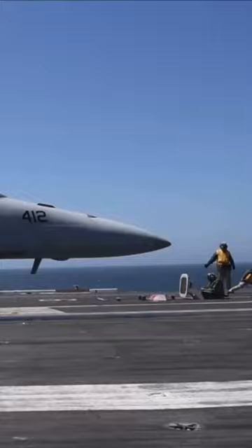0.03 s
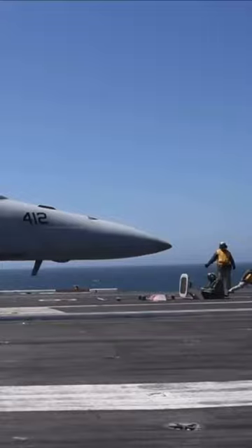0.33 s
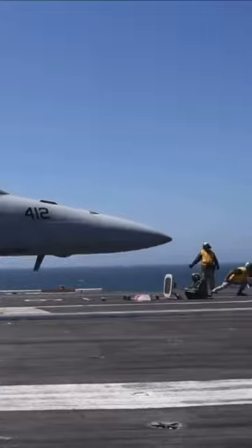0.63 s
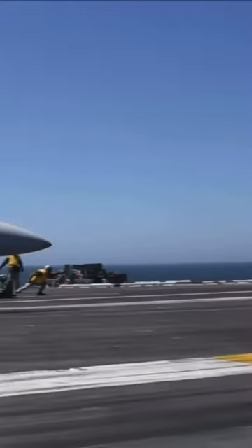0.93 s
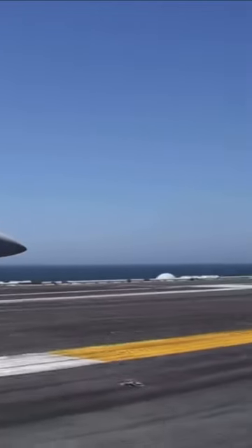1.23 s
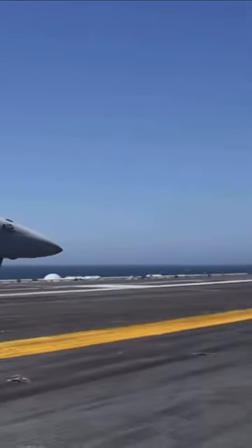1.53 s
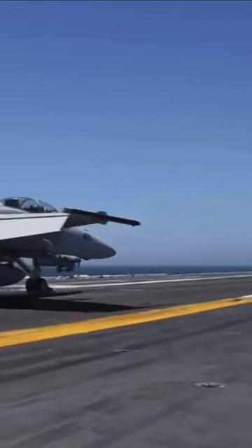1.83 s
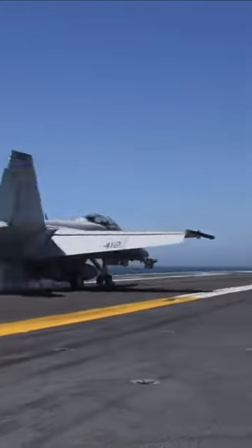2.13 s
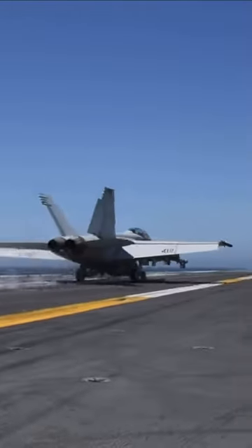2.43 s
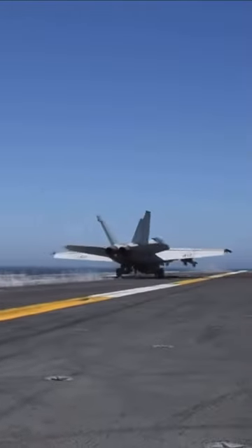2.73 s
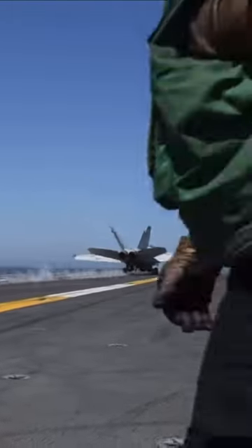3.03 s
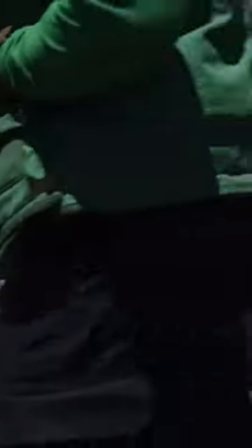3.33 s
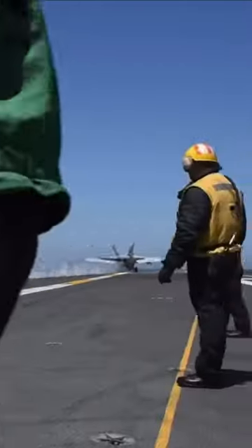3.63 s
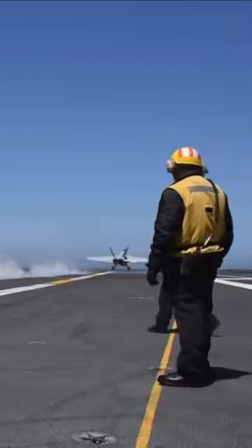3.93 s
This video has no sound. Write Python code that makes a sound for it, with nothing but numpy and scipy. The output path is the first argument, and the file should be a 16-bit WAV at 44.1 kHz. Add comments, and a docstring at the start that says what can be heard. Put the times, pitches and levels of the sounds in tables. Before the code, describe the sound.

Jet engines roar at full power, pass close by and rumble away.

```python
"""A bright roar, with hiss and the rush of air intakes, is heard first: a jet at full power, seen from
ahead on an open carrier deck. It rolls past the microphone at about 2 s and races away. From behind,
the deep rumble of the exhaust's large eddies takes over, and the hiss of its fine turbulence dulls
with distance. A faint, steady deep bass lies in the middle. The jet's sound crosses between the
microphone's two ports and overloads them throughout."""
import sys
import numpy as np
from scipy import signal
from scipy.io import wavfile
from scipy.ndimage import map_coordinates

SR = 44100
rng = np.random.default_rng(int(sys.argv[2]) if len(sys.argv) > 2 else 0)


def digitize_waveform(pressure):
    """Quantize a signal to 16-bit integers and store it at the path in sys.argv[1].

    Rows of a 2-D input are taken as channels; values are limited to [-1, 1].
    """
    field = np.atleast_2d(pressure).T
    bounded = np.clip(field, -1, 1)
    quanta = np.round(bounded * 32767).astype(np.int16)
    wavfile.write(sys.argv[1], SR, quanta)


N = 176400
TIME = np.arange(N) / SR

# direction and directness of the sound: (time [s], lag of the left port [ms], coherence [0-1])
BEARING = [(0, -0.17, 0.37), (.6, -.17, 0.6), (.9, -0.21, 0.6), (1.3, -0.18, 0.27), (1.7, -0.15, 0.76),
           (2.0, -0.044, 0.74), (2.3, 0.066, 0.6), (2.55, 0.068, 0.32), (2.85, 0.052, 0.47),
           (3.2, 0.02, 0.94), (3.37, 0.093, 0.85), (3.6, 0.068, 0.84), (4, 0.024, 0.93)]
# shadow on the right port while the jet is off to the left: (time [s], centre [Hz], height [dB])
PORT_SHADOW = [(0, 3400, 1), (.55, 3100, -1.5), (.8, 2800, -4), (1.15, 2700, -3), (1.4, 2600, -1)]
# envelopes of the exhaust's three parts: (time [s], relative level [dB], left minus right [dB])
ROAR_ENVELOPE = [(0.05, -22.5, -2), (0.14, -23.5, -3.5), (0.57, -24, -6), (0.92, -23.5, -4),
                 (1.3, -24.8, -4), (1.55, -25.5, -1.5), (1.77, -24, -1.5), (1.97, -24.5, -3),
                 (2.1, -27, -5.5), (2.33, -25, -4), (2.41, -23.6, -4), (2.59, -23.5, -2.5),
                 (2.82, -21.5, -1), (3.03, -24.5, -2), (3.14, -21.5, -5), (3.28, -20.7, -2),
                 (3.55, -21.5, -3), (3.76, -20, -1.5), (4.0, -23.5, -0.5)]
HISS_ENVELOPE = [(0.05, -24.5, 2.5), (0.5, -23.5, 2.5), (0.72, -24.5, 2), (1.25, -23, -1), (1.6, -23, 0.5),
                 (1.8, -23, -1), (1.97, -24, -3), (2.28, -23, -2.5), (2.42, -22, -1), (2.6, -23, 0.5),
                 (3.0, -24, 1), (3.3, -27.5, 1), (3.48, -27.5, 0), (3.8, -28, 1.5), (4.0, -30, 1.5)]
RUMBLE_ENVELOPE = [(0, -30.5, -8), (.85, -30.5, -5.5), (1.35, -30.5, -3.5), (1.7, -33.5, 0.5),
                   (1.86, -31.5, 2.5), (2.01, -25.5, -1), (2.23, -24.5, -2), (2.45, -26, 3),
                   (2.56, -28.5, 5), (2.86, -27, 1), (3.03, -24.5, -2), (3.3, -22.5, -1.5),
                   (3.55, -23.5, 2), (3.8, -25, -2.5), (3.93, -20, -4), (4, -22, -1)]
# spectra: (frequency [Hz], relative spectral density [dB], share of the coherence [0-1])
ROAR_SPECTRUM = [(382, -7, 0.44), (600, -4.5, 0.39), (970, -1, 0.86), (1420, -1.3, 0.63),
                 (2080, -3.5, 0.65), (2820, -2.5, 0.57), (3760, -9.8, 0.26), (5250, -20.5, 0.58)]
HISS_SPECTRUM = [(1920, -13, 0.36), (3000, 2.5, 0.19), (4200, 0.5, 0.28), (6000, -1.5, 0.32),
                 (8100, -0.6, 0.33), (10500, -1.5, 0.088), (14000, -0.5, 0.075)]
RUMBLE_SPECTRUM = [(28, -22, .3), (50, -15.5, .4), (81, -4.5, 0.75), (132, -4, 1), (240, -0.5, 0.96),
                   (413, -2.5, 1), (536, -1.5, 0.9), (705, -5, 0.59), (1100, -9, 0.62)]
CENTRED_BASS_SPECTRUM = [(28, -7, .5), (60, -1, 0.9), (110, 1.5, 1), (170, -10, 1)]
# moving humps on those spectra: (time [s], centre [Hz], height [dB])
ROAR_HUMP = [(0, 1140, 4), (.7, 990, 1.5), (1.15, 850, 1), (1.42, 1800, 0.5), (1.62, 2120, 5),
             (1.78, 1950, 5), (1.97, 2100, 8), (2.25, 2900, 3), (2.7, 2400, 2.5), (3.3, 1900, 1.5),
             (3.7, 1600, 1), (3.85, 1240, 2.5), (4, 1030, 4.5)]   # moves with the angle to the jet
PORT_RESONANCE = [(2.2, 6340, 3), (2.5, 6200, 3.5), (3.25, 6600, 1.5), (3.5, 6250, 5), (4, 6300, 2)]   # a peak near 6 kHz, probably the microphone's, colouring the hiss
RUMBLE_BOOM = [(0, 400, -1.5), (1.5, 500, 1.5), (1.95, 350, 2.5), (2.25, 304, 3), (2.6, 151, 2.5),
               (3.1, 153, 6), (3.7, 198, 2.5), (3.95, 244, 5)]   # the rumble's strongest region
# rush of the intakes, fading once the jet has passed: (time [s], centre [Hz], level [dB])
INTAKE_RUSH = [(0, 5820, -25.5), (.5, 6000, -25), (.8, 5840, -27), (1.25, 5700, -28.5), (1.5, 6150, -26.3),
               (1.66, 6700, -27), (1.79, 7400, -27.5), (1.93, 7350, -38), (2.15, 7140, -44),
               (2.6, 6800, -54)]
# its resonances: (multiple of the centre [ratio], relative level [dB], width of one stage [Hz],
# left minus right on approach [dB], swell once rolling [dB])
INTAKE_RESONANCES = [(1.01, -1.2, 2000, -15, 0), (1, -8, 400, -4, -2.5), (.77, -7.5, 1600, -5, 6)]

ROLL_S, ROLL_RISE_S = .65, .25   # the jet starts to roll
PASS_S, PASS_LENGTH_S = 2.06, 0.12
CROSSING_S = 0.58   # time the intakes take to swing to the middle before the pass
RECEDE_S, DULLING_DB_PER_OCT_S, PASS_DULLING_DB_PER_OCT = 3.3, -5, -2.5
AIR_LOSS_DB_PER_S, AIR_HZ, AIR_START_S = 10.5, 12500, 1.97
HISS_PAN_DB_PER_OCT, HISS_PIVOT_HZ = 2, 7460   # from ahead the top of the hiss favours the left port
BANDS_PER_OCTAVE, CUTOFF_HZ = 3, 15000
SILENT_START_S, OVERLOAD_TOP, MIC_TREBLE_HZ = .036, 0.29, 12800


def from_db(db):
    """Amplitude grows tenfold for every 20 dB."""
    return 10 ** (np.asarray(db) / 20)


def unit_rms(x):
    """Normalisation to a mean power of 1."""
    return x / np.sqrt(np.mean(x ** 2) + 1e-20)


def in_time(rows):
    """Linear interpolation of each column of a curve to every sample."""
    times, *columns = np.transpose(rows)
    return [np.interp(TIME, times, column) for column in columns]


def drift(rate_hz):
    """Low-passed noise gives a slow random motion of spread 1."""
    pole = np.exp(-200 * np.pi * rate_hz / SR)   # one step per 100 samples
    slow = signal.lfilter([1], [1, -2 * pole, pole * pole], rng.standard_normal(N // 100 + 1002))[1000:]
    return np.interp(np.arange(N) / 100, np.arange(len(slow)), unit_rms(slow))


def panned(db):
    """Constant-power panning: left and right gains for a level difference."""
    gains = from_db(np.array([db, -db]).reshape(2, -1) / 2)
    return gains / np.sqrt(np.mean(gains ** 2, axis=0))


def behind():
    """Weight for directivity: 0 while the jet approaches, 1 once its nozzles have passed."""
    return .5 + .5 * np.tanh((TIME - PASS_S) / PASS_LENGTH_S)


def moving_hump(rows, octaves):
    """A Gaussian bell over log frequency that follows a curve; gives dB as a function of Hz."""
    centre, height_db = in_time(rows)
    return lambda hz: height_db * np.exp(-.5 * (np.log2(hz / centre) / octaves) ** 2)


def far_port_shadow():
    """Acoustic shadowing notches the right port only; gives dB as a function of Hz."""
    notch_db = moving_hump(PORT_SHADOW, octaves=0.37)
    return lambda hz: notch_db(hz) * np.array([[0], [1]])


def white_at_ports():
    """A path difference delays a direct pair of white noises; a diffuse pair is uncorrelated."""
    lag_ms, _ = in_time(BEARING)
    white = rng.standard_normal((3, N))
    left = map_coordinates(white[0], [np.arange(N) - lag_ms * SR / 1000], order=3, mode="mirror")
    return np.array([left, white[0]]), white[1:]


def blend(direct, diffuse, coherence):
    """Uncorrelated sounds add in power; the coherence is the direct sound's share."""
    coherence = np.clip(coherence, 0, .98)
    return np.sqrt(coherence) * direct + np.sqrt(1 - coherence) * diffuse


def turbulence(spectrum, coherence, shape_db, flutter_db, flutter_hz):
    """Turbulent noise: bands flutter, partly together; shape_db(hz) recolours them at constant power."""
    points, db, share = np.transpose(spectrum)
    whites = [white_at_ports(), white_at_ports()]
    common_flutter = drift(flutter_hz)
    edges = CUTOFF_HZ * 1.03 * 2 ** (-np.arange(28, -1, -1) / BANDS_PER_OCTAVE)
    out, power = 0, 0
    for k, (low, high) in enumerate(zip(edges, edges[1:])):
        hz, own_flutter = np.sqrt(low * high), drift(flutter_hz)
        if high < points[0] or low > points[-1]:
            continue
        band_db, band_share = (np.interp(np.log(hz), np.log(points), c) for c in (db, share))
        white = blend(*whites[k % 2], coherence * band_share)
        band = signal.sosfilt(signal.butter(2, [low, high], "band", fs=SR, output="sos"), white)
        gain = from_db(band_db + shape_db(hz))
        out = out + band * gain * from_db(flutter_db * (own_flutter + common_flutter))
        power = power + np.mean(np.atleast_2d(gain) ** 2, axis=0) * (high - low)
    return unit_rms(out / np.sqrt(power))


def roar(coherence):
    """Turbulent mixing radiates directionally: a broad hump rises on approach and sinks afterwards."""
    db, pan_db = in_time(ROAR_ENVELOPE)
    hump_db, shadow_db = moving_hump(ROAR_HUMP, octaves=0.5), far_port_shadow()
    shape_db = lambda hz: hump_db(hz) + shadow_db(hz)
    noise = turbulence(ROAR_SPECTRUM, coherence, shape_db, flutter_db=0.96, flutter_hz=16)
    return from_db(db + 4) * panned(pan_db) * noise


def hiss(coherence):
    """Fine turbulence hisses; air absorption grows with distance and with the square of frequency."""
    db, pan_db = in_time(HISS_ENVELOPE)
    passed = behind()
    # negative dulling tilts the treble up, offsetting part of the absorption
    dulling = PASS_DULLING_DB_PER_OCT * passed + DULLING_DB_PER_OCT_S * np.maximum(TIME - RECEDE_S, 0)
    slope = HISS_PAN_DB_PER_OCT * (1 - passed) * np.array([[.5], [-.5]]) - dulling
    air_db = AIR_LOSS_DB_PER_S * np.maximum(TIME - AIR_START_S, 0)
    resonance_db, shadow_db = moving_hump(PORT_RESONANCE, octaves=0.5), far_port_shadow()

    def shape_db(hz):
        tilt_db = slope * np.log2(hz / HISS_PIVOT_HZ)
        return tilt_db - air_db * (hz / AIR_HZ) ** 2 + resonance_db(hz) + shadow_db(hz)

    noise = turbulence(HISS_SPECTRUM, coherence, shape_db, flutter_db=0.73, flutter_hz=17.5)
    return from_db(db + 4.5) * panned(pan_db) * noise


def gliding_resonance(x, hz, width_hz, block=256):
    """Two equal resonators in cascade pass a band about a moving centre; rms 1."""
    radius = np.exp(-np.pi * width_hz / SR)
    out, state = np.zeros((2, N)), np.zeros((2, 2, 2))
    for i in range(0, N, block):
        stage = [1, 0, -1, 1, -2 * radius * np.cos(2 * np.pi * hz[i] / SR), radius * radius]
        out[:, i:i + block], state = signal.sosfilt([stage, stage], x[:, i:i + block], zi=state)
    return unit_rms(out)


def intake():
    """Inrushing air excites two broad resonances and a whining one; all glide up as the jet nears."""
    hz, db = in_time(INTAKE_RUSH)
    rolling = np.clip((TIME - ROLL_S) / ROLL_RISE_S, 0, 1)
    aside = np.clip((PASS_S - TIME) / CROSSING_S, 0, 1)
    out = 0
    for multiple, level_db, width_hz, pan_db, swell_db in INTAKE_RESONANCES:
        air = blend(*white_at_ports(), coherence=0.83)
        rush = gliding_resonance(air, multiple * hz, width_hz)
        out = out + from_db(db + level_db + swell_db * rolling) * panned(pan_db * aside) * rush
    return out


def rumble(coherence):
    """Large exhaust eddies radiate rearward: diffuse from ahead, strong and direct from behind."""
    db, pan_db = in_time(RUMBLE_ENVELOPE)
    ahead = 1 - behind()
    directness = 1 - 0.8 * ahead
    diffuse_bass_db = ahead   # 1 dB more while the rumble arrives from all sides
    boom_db = moving_hump(RUMBLE_BOOM, octaves=0.33)
    noise = turbulence(RUMBLE_SPECTRUM, coherence * directness, boom_db, flutter_db=1.1, flutter_hz=19)
    return from_db(db + 3.5 + diffuse_bass_db) * panned(pan_db) * noise


def centred_bass():
    """A faint, steady deep bass of partly coherent noise, equally strong at both ports."""
    noise = turbulence(CENTRED_BASS_SPECTRUM, coherence=0.65, shape_db=lambda hz: 0,
                       flutter_db=-1.5, flutter_hz=6)
    return from_db(-50.5) * noise


def scene():
    """Superposition: the independent sources, all sounding from the start, add at the two ports."""
    _, coherence = in_time(BEARING)
    return centred_bass() + rumble(coherence) + roar(coherence) + hiss(coherence) + intake()


def record(dry):
    """Saturation squashes the peaks, after a brief silence at the start; low-passes soften and cut the treble."""
    squashed = OVERLOAD_TOP * np.tanh(dry / OVERLOAD_TOP) * (TIME > SILENT_START_S)
    softened = signal.sosfilt(signal.butter(2, MIC_TREBLE_HZ, fs=SR, output="sos"), squashed)
    return signal.sosfilt(signal.ellip(10, .1, 70, CUTOFF_HZ, fs=SR, output="sos"), softened)


dry = scene()
out = record(dry)
digitize_waveform(out)
```